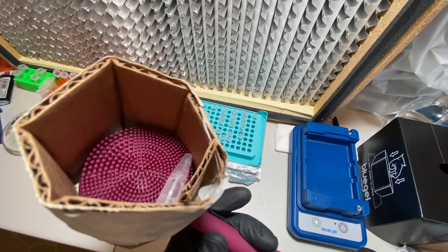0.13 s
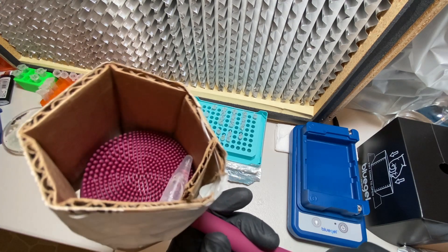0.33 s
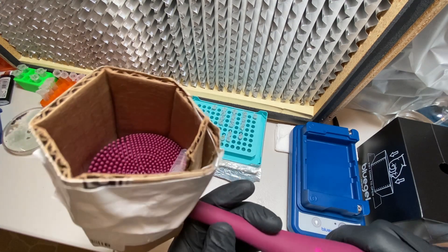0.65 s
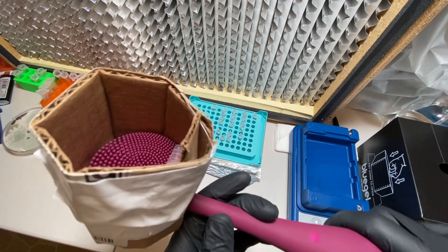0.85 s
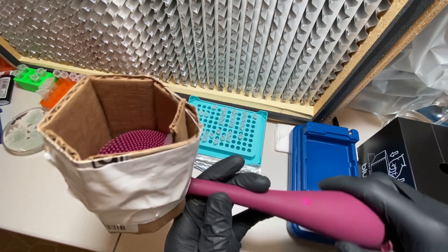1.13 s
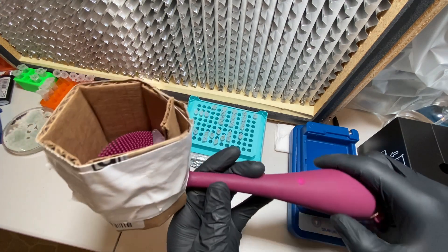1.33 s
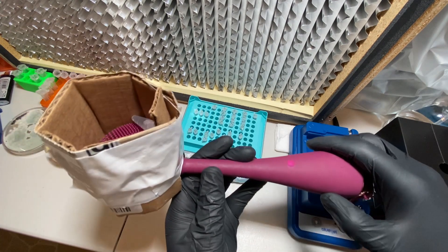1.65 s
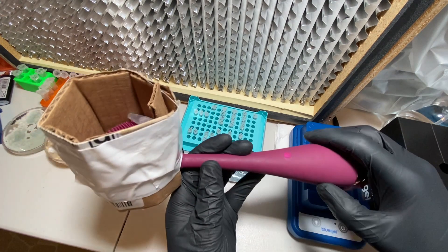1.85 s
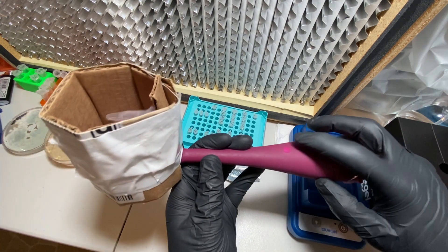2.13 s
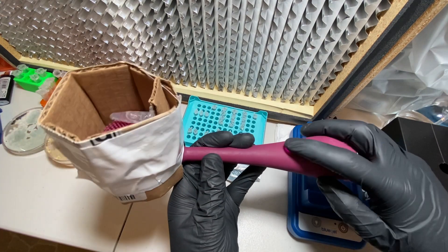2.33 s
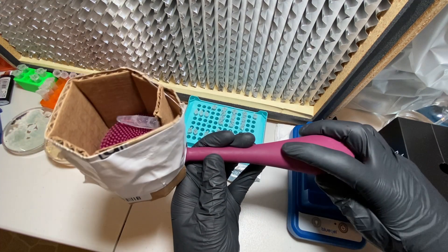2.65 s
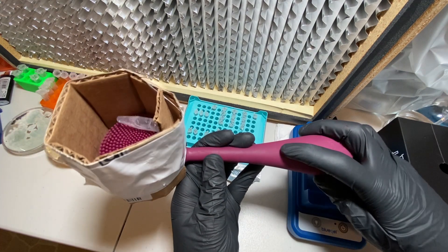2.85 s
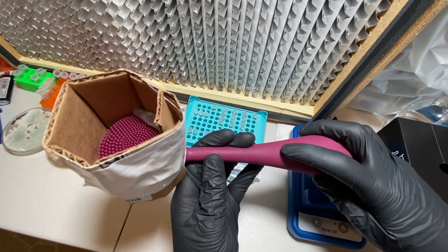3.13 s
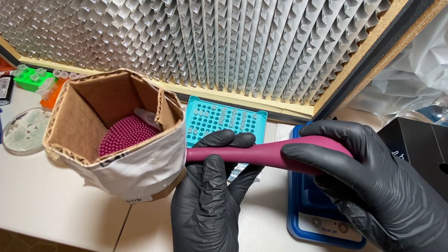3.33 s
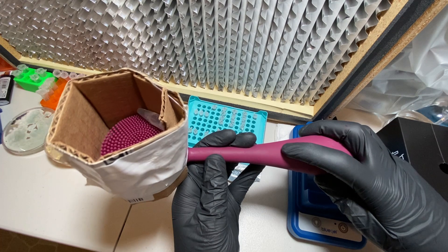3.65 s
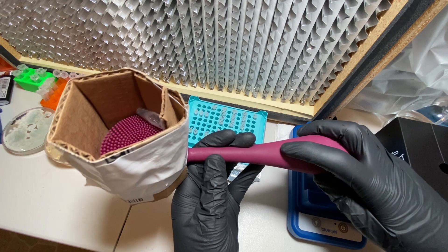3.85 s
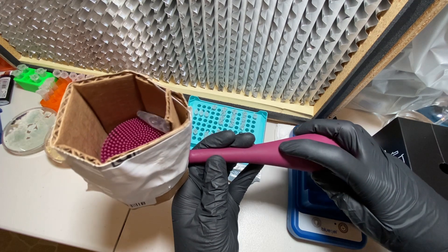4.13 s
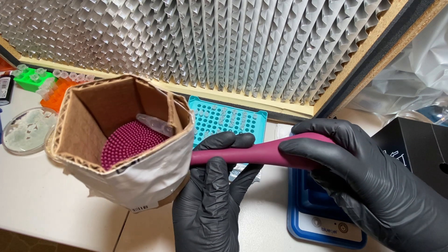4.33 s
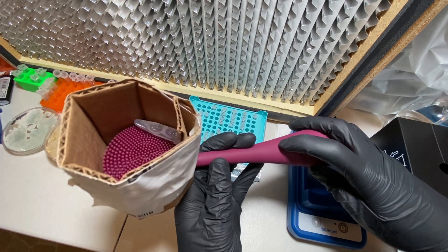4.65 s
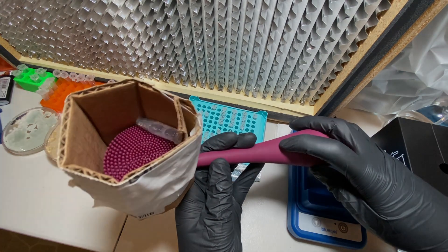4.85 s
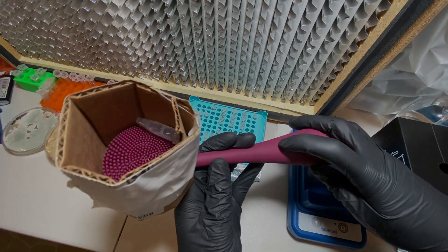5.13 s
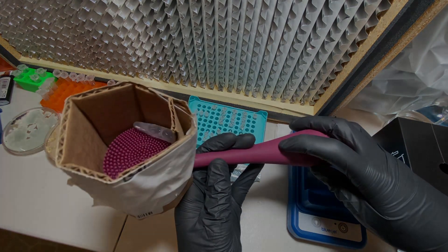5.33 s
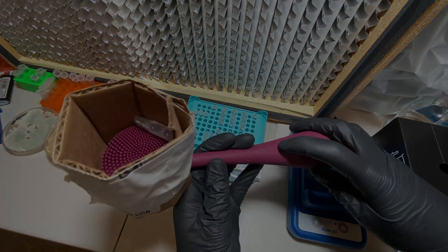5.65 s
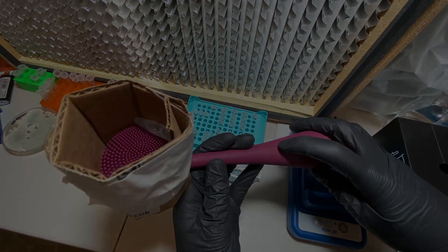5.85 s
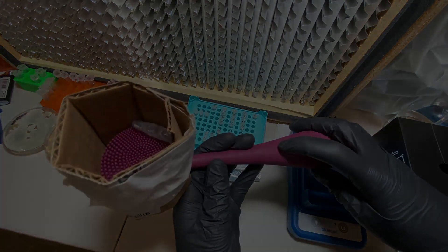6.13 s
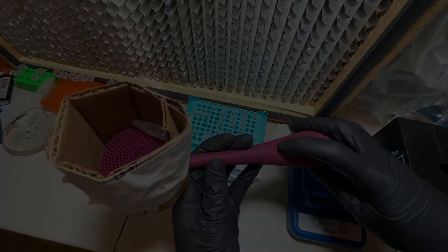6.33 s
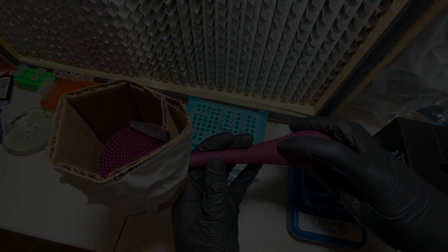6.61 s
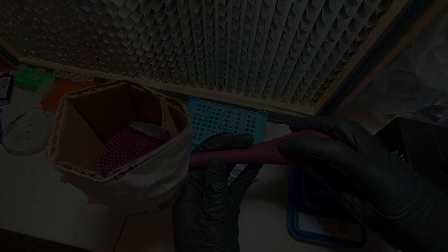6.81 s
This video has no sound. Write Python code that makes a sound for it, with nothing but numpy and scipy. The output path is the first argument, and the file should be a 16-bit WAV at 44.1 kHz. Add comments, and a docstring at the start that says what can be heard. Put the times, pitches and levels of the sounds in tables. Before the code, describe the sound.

Close hollow cardboard knocks and chatter over a deep steady vibrating hum; late button clicks raise the motor's pitch before it slows, over soft ventilation.

```python
"""A small lab, close on the bench: a vibrating massager hums in a cardboard cup and a plastic tube hops on its pad.
From the start knocks ring the cup's modes over a near-sine hum; the mouth tips away until 3.2 s. Chatter, timed by
the motor's turns, thins at 1.1 s; at 1.75 s the tube slides in a run of tiny slips. Far off, noise in low room modes
swells at 3.3 s. Button clicks ring the handle from 5.4 s; near 5.6 s the motor steps up, from 6.6 s it winds down.
Behind it all, ventilation: shaped noise and faint fan tones, fading from 5.2 s."""
import sys
import numpy as np
from scipy import signal
from scipy.io import wavfile
from scipy.ndimage import map_coordinates

SR = 44100
rng = np.random.default_rng(int(sys.argv[2]) if len(sys.argv) > 2 else 0)


def wav_out(sig):
    """Save sig, one row per channel (or a flat mono array), as 16-bit PCM at SR to the path in sys.argv[1]."""
    wavfile.write(sys.argv[1], SR, np.round(np.clip(np.atleast_2d(sig).T, -1, 1) * 32767).astype(np.int16))


N = 307818

# speed of the motor: t/s, turn rate/Hz
MOTOR_SPEED = [(0, 70.3), (5.57, 68.6), (5.66, 80.5), (5.74, 84), (6.56, 84), (6.76, 78), (6.98, 50)]


def motor_turns():
    """Turns completed by the motor at every sample: its speed summed over time."""
    return np.cumsum(in_time(MOTOR_SPEED)) / SR


# shaking of the cup: t/s, relative level/dB
HUM_LEVEL = [(0, -30), (.85, -31.5), (1.1, -33.5), (1.9, -36), (4.3, -35.5), (5.58, -38.5), (5.69, -35.5),
             (5.85, -36.5), (6.3, -39), (6.76, -40), (6.86, -48), (6.98, -62)]
# how far the cup's mouth is tipped away: t/s, share 0-1
MOUTH_TIPPED = [(0, 0.16), (.9, 0.37), (1.4, 0.6), (2.2, 0.73), (3.2, 0.84)]


def motor(turns, wobble_db, second_db):
    """The off-centre weight shakes the cup in a nearly pure sine; the hopping load makes it waver."""
    tipped = in_time(MOUTH_TIPPED)
    sides = np.array([[1], [-1]])
    lag = 1.2 - .6 * tipped  # radians between the sides
    left_db = 5.2 - 1.6 * tipped
    angle = 2 * np.pi * turns + .06 * drift(8) + sides * lag / 2
    wave = np.sin(angle) + from_db(second_db) * np.sin(2 * angle)
    level_db = in_time(HUM_LEVEL) + 1.83 + wobble_db * drift(6.7)
    return np.sqrt(2) * wave * from_db(level_db + sides * left_db / 2)


# knocks of the tube on cup and pad: t/s, relative level of hollow ring/dB, relative level of sharp edge/dB
TUBE_KNOCKS = [(0.005, -26, -37.5), (0.064, -26.5, -39.5), (0.106, -28, -42), (0.166, -29.5, -46.0),
               (0.261, -27.0, -41.5), (0.307, -24.0, -37.5), (0.351, -25.5, -36), (0.392, -30.5, -39.0),
               (0.477, -26, -41.5), (0.511, -28.5, -42), (0.555, -28.5, -44), (0.569, -30, -39.5),
               (0.611, -27.0, -40), (0.666, -32.5, -45.5), (0.725, -27.0, -39), (0.772, -27.5, -40.5),
               (0.813, -27, -43.5), (0.86, -26.5, -40.5), (0.915, -25.5, -37.5), (0.989, -26.0, -37.5),
               (1.031, -29.5, -40.5), (1.088, -28, -39.5), (1.156, -33.5, -40.5), (1.206, -31.5, -44.5),
               (1.247, -27.5, -48), (1.318, -34.5, -43), (1.377, -31.0, -45.0), (1.419, -25.5, -37.5),
               (1.509, -26.5, -42.5), (1.547, -30, -38.5), (1.637, -32, -43), (1.668, -25, -41.5),
               (1.702, -28.5, -50.5), (1.761, -30.5, -63), (1.78, -25, -44), (1.822, -30.0, -43.5),
               (1.893, -27, -45), (1.937, -35, -49.0), (2.056, -26, -38), (2.098, -22, -43),
               (2.136, -32.0, -49.0), (2.166, -34, -47.5), (2.197, -31.5, -48), (2.229, -22.5, -40.5),
               (2.238, -28.5, -38), (2.312, -28, -42), (2.326, -25, -36.5), (2.385, -28.5, -43),
               (2.414, -34.5, -46), (2.476, -25, -40), (2.492, -35, -34), (2.517, -18.0, -38.5),
               (2.599, -24, -52), (2.66, -21.5, -35), (2.824, -27.5, -51), (2.835, -28, -41),
               (2.876, -21, -35), (3.179, -25, -37), (3.236, -34.5, -44), (3.438, -28, -39.5),
               (3.54, -31, -44), (3.684, -27.5, -44), (3.728, -30.5, -40.5), (3.799, -30.5, -41.5),
               (3.83, -36, -51), (3.913, -30, -40.5), (3.942, -32, -44), (4.087, -30, -41.5),
               (4.143, -28.5, -39.5), (4.233, -36, -45), (4.275, -28, -37.0), (4.362, -33.5, -43.5),
               (4.433, -32, -40.5), (4.506, -30, -43.5), (4.562, -34.5, -51), (4.637, -37.5, -41),
               (4.649, -26.5, -36.5), (4.793, -30, -37.5), (4.882, -35.5, -47), (4.913, -37, -45.5),
               (4.937, -30, -37.5), (5.08, -26, -30.5), (5.257, -37, -44), (5.284, -32.5, -49),
               (5.368, -31, -39.5), (5.498, -30, -38.5), (5.574, -32.5, -41), (5.711, -32.5, -43),
               (5.85, -28.5, -39.0), (5.956, -33, -44.5), (6.001, -34.5, -46.0), (6.119, -33.5, -42),
               (6.273, -32.5, -41), (6.393, -35, -45), (6.467, -37, -48), (6.511, -38, -49.0),
               (6.62, -43, -51.0), (6.668, -37, -44.5), (6.857, -41.5, -54)]
# dull landings that flex the wall: t/s, level/dB
WALL_THUDS = [(2.239, -40), (2.329, -31.5)]


def knocks(ring_db, edge_db):
    """The tube lands after each hop; now and then the whole wall gives a dull thud."""
    times, hollow, edge = np.transpose(TUBE_KNOCKS)
    thuds = ring(clicks(*np.transpose(WALL_THUDS)), hz=366, t60=0.069, lag=0.77)
    return contacts(times, hollow + ring_db, edge + edge_db, top_hz=2970, bite_db=5.0) + thuds


# soft, distinct touches in the tipped cup, often one turn before a knock: t/s, relative level/dB
SOFT_GRAZES = [(3.422, -32.5), (3.522, -33), (3.654, -34.0), (3.67, -33), (3.886, -31.5), (4.071, -29.5),
               (4.186, -39), (4.26, -32), (4.322, -30), (4.42, -29.5), (4.706, -29.5), (4.82, -30.0),
               (4.994, -32), (5.196, -31), (5.311, -35), (5.441, -31.5), (5.56, -35), (5.599, -37),
               (5.789, -33.5), (5.814, -35), (5.942, -32.5), (6.096, -32), (6.57, -41), (6.913, -37)]
# light contacts between knocks: t/s, relative level/dB
CHATTER_LEVEL = [(0, -30.5), (1.15, -45.5), (1.68, -45), (1.95, -31), (2.15, -38), (2.9, -45), (3.12, -52),
                 (3.25, -35.5), (6.7, -38), (6.98, -40.5)]
MISSED_SHARE = .28  # share of turns in which the tube touches nothing


def chatter(turns, ring_db, edge_db, uneven_db, jitter_s):
    """Between knocks the tube grazes the wall softly, once a turn or not at all, and damps the ring."""
    at = turn_starts(turns)
    when, force = rng.standard_normal((len(at), 2)).T
    times = at / SR + jitter_s * when
    bout_db, free = rocking(times)
    free = free & (rng.random(len(at)) > MISSED_SHARE)
    db = in_time(CHATTER_LEVEL)[at] + uneven_db * np.minimum(force, 1) + bout_db
    times, db = np.r_[np.c_[times, db][free], SOFT_GRAZES].T
    edge = db + edge_db + 3 * rng.standard_normal(len(db))
    return contacts(times, db + ring_db, edge, top_hz=1600, bite_db=-4.0, soft_db=4.0, ring_share=.55)


def turn_starts(turns):
    """Samples at which the motor begins a new turn."""
    return np.flatnonzero(np.diff(np.floor(turns)))


# in the tipped cup touches build up before each knock and die away after it
BOUT_RISE_S, BOUT_FALL_S, BOUT_DB = 0.025, 0.022, 8.0


def rocking(times):
    """Extra dB of a touch within a bout, and whether the tube is free to touch at that moment at all."""
    wait = np.array(TUBE_KNOCKS)[:, 0] - times[:, None]
    width_s = np.where(wait > 0, BOUT_RISE_S, BOUT_FALL_S)
    nearness = np.exp(-(wait / width_s) ** 2).max(axis=1)
    # right at a knock or graze the tube touches nothing else
    wait = np.c_[wait, np.array(SOFT_GRAZES)[:, 0] - times[:, None]]
    free = np.abs(wait).min(axis=1) > .008
    tipped = np.interp(times, *np.transpose(MOUTH_TIPPED))
    return BOUT_DB * tipped * (nearness - 2 / 3), free


# the tube slides down the wall as the cup tips: start t/s, end t/s, relative level of each tiny slip/dB
WALL_SLIDE = (1.745, 1.955, -37)
SLIPS_PER_S = 280


def slide(edge_db, uneven_db):
    """Sliding, the tube buzzes on the wall several times a turn in a rough run of small contacts."""
    start, end, db = WALL_SLIDE
    times = np.arange(start, end, 1 / SLIPS_PER_S)
    when, force = rng.uniform(-0.98, 1, (len(times), 2)).T
    times = times + when / SLIPS_PER_S / 2
    levels = db + uneven_db * force
    return contacts(times, levels, levels + edge_db, top_hz=2370, bite_db=5.5, soft_db=2.0, ring_share=0.96)


# stiff cardboard under a hard hit: f/Hz, t60/s, relative level/dB, lag of the right side/rad
CARDBOARD_CRACK = [(3310, 0.0019, 9.5, 5.2), (3280, 0.0011, 14, 7.08), (4470, 0.00064, 18, 2.02)]
# the tube's own plastic: f/Hz, t60/s, relative level/dB, lag of the right side/rad
TUBE_PLASTIC = [(10670, 0.0039, 0.5, 2.5), (11800, 0.0014, 6.5, -1.81), (14500, 0.006, -5.5, 1.5)]
RIM_SHADE_DB = 8.0  # loss of the ticks behind the rim of a fully tipped cup


def contacts(times, ring_db, edge_db, top_hz, bite_db, soft_db=0, ring_share=1, tick_db=4.5, bounce_s=0.00189):
    """The tube ticks, the wall cracks, and the cup rings; the tipped rim shades the ticks."""
    tipped = np.clip(np.interp(times, *np.transpose(MOUTH_TIPPED)), 0, 1)
    # each touch is followed, within bounce_s, by a weak bounce
    touches = np.r_[times, times + bounce_s * rng.random(len(times))]
    levels = np.r_[ring_db, ring_db - 12]
    hollow = cup(touches, levels, np.r_[tipped, tipped], bite_db, soft_db, ring_share)
    crack = scuff(times, edge_db - 5 * (1 - tipped), CARDBOARD_CRACK, clean=.5) * pan(4.0)
    tick = scuff(times, edge_db + tick_db - RIM_SHADE_DB * tipped, TUBE_PLASTIC, clean=0.35)
    return band(hollow, 300, top_hz) + band(crack, 1500, 11000) + band(tick, 7000, 18000)


# air trapped in the cup rings on: f/Hz, t60/s, relative level/dB, lag of the right side/rad
CUP_CAVITY = [(1120, 0.12, -29, 2.72), (1232, 0.16, -24, 3.5), (1304, .14, -30, 3.0)]
# air and walls of the cup: mean f/Hz, full t60/s, relative level/dB facing, the same tipped away,
# lag of the right side/rad
CUP_MODES = [(382.5, 0.059, -37, -23, 0.039), (542.2, 0.011, -10.5, -13.5, 4.06),
             (915, 0.057, -19.5, -10.5, 2.78), (1129.4, 0.05, -16.5, 0, 2.545),
             (1219, 0.017, 5.5, -13.5, 2.25), (1602, 0.018, -16.5, -16, 1.66),
             (1754, 0.032, -24.5, -10.5, 2.963), (2062, 0.011, -9, -24.5, 5.52)]
PANEL_SPREAD = 0.04  # panels differ in stiffness: largest share of pitch below and above the mean


def cup(times, db, tipped, upper_db, soft_db, ring_share):
    """Hollow ring of the cup; its colour shifts as the mouth tips, and a little with the panel that is hit."""
    out = strike(times, db, CUP_CAVITY)
    for hz, t60, facing_db, away_db, lag in CUP_MODES:
        panel = rng.integers(-2, 3, len(times))
        mouth_db = facing_db + tipped * (away_db - facing_db)
        colour_db = upper_db * (hz > 1400) + soft_db * (hz < 700)
        level = db + mouth_db + rng.standard_normal(len(times)) + colour_db
        for k in np.unique(panel):
            drive = clicks(times[panel == k], level[panel == k])
            # the upper modes radiate almost no bass
            if hz > 1400:
                drive = np.diff(drive, prepend=0) * SR / (2 * np.pi * hz)
            out = out + ring(drive, hz * (1 + k / 2 * PANEL_SPREAD), t60 * ring_share, lag)
    return out * pan(5.5)


# button on the handle: t/s, relative level/dB
BUTTON_CLICKS = [(5.403, -23.5), (5.582, -37), (6.3401, -26.5), (6.4873, -38.5), (6.9735, -29.5)]
# shell of the handle: f/Hz, t60/s, relative level/dB, lag of the right side/rad
HANDLE_SHELL = [(3770, 0.0021, 6.5, 0.68), (5100, 0.0027, 6, 0.99), (6730, 0.00073, 6, 0.94),
                (11200, 0.0011, 3.5, 1.0)]


def button():
    """Each click of the button is a mostly clean snap that rings the stiff shell of the handle."""
    times, db = np.transpose(BUTTON_CLICKS)
    return band(scuff(times, db, HANDLE_SHELL, clean=.9), 3000, 14000)


def echoes(rattle):
    """Bench and hood close by return the rattle and, brighter, bare impulses at the button's clicks."""
    from_rattle = room(rattle, t60=0.1503, low_hz=320, high_hz=8200, gap_s=0.0052)
    impulses = clicks(*np.transpose(BUTTON_CLICKS))[None]
    from_button = room(impulses, t60=0.22, low_hz=3620, high_hz=7560, gap_s=0.0021)
    return from_db(-14.5) * from_rattle + from_db(6.5) * from_button


# whine of the rotor: multiples of its speed
ROTOR_ORDERS = (11, 13, 16, 21)
# one for each multiple: relative level/dB
ROTOR_LEVELS = (-64, -60.5, -65.5, -75)
# overall fade of whine and ventilation: t/s, gain/dB
BACKGROUND_FADE = [(5.2, 1), (6.98, -7)]


def whine(turns, wobble_db):
    """The rotor sings faintly on a few multiples of its speed."""
    lines = 0
    for order, db in zip(ROTOR_ORDERS, ROTOR_LEVELS):
        gain = from_db(db + wobble_db * drift(1))
        angle = 2 * np.pi * order * turns + order * 0.032 * drift(3.7)
        lines = lines + gain * np.sin(angle - np.array([[0], [2.4]]))
    return np.sqrt(2) * lines * from_db(in_time(BACKGROUND_FADE)) * pan(6.5)


# distant rumble: t/s, relative level/dB
RUMBLE_LEVEL = [(0, -52.5), (1.5, -55.5), (2.8, -50.5), (3.3, -47), (3.8, -50), (4.3, -55.5), (6.98, -58.5)]
# low room resonances that carry it: f/Hz, width/Hz, relative level/dB
LOW_ROOM_MODES = [(110, 54, -5), (139.8, 7.5, -5.5), (195.7, 25.7, -3), (279.8, 29, -8), (319, 89, -8.5)]
# pitch of the drone in the rumble: t/s, f/Hz
DRONE_PITCH = [(2.85, 285), (2.95, 247.6), (3.2, 250), (3.43, 346.3), (3.52, 278), (3.65, 241.4)]


def rumble(drone_db):
    """Far noise swells in the low resonances of the room; a narrow drone wanders in pitch inside it."""
    out = 0
    for hz, width_hz, db in LOW_ROOM_MODES:
        t60 = np.log(1000) / np.pi / width_hz
        out = out + from_db(db) * rms_one(ring(rng.standard_normal(N), hz, t60, 0.66))
    angle = 2 * np.pi * np.cumsum(in_time(DRONE_PITCH)) / SR + .6 * drift(10)
    drone = np.sin(angle - np.array([[0], [.8]])) * from_db(drone_db + 3 * drift(5))
    return (rms_one(out) + drone) * from_db(in_time(RUMBLE_LEVEL))


# ventilation spectrum: f/Hz, relative density level/dB
AIR_SPECTRUM = [(120, -12), (240, -12), (360, 3), (600, -3), (850, -7), (1200, 4.5), (1700, -11.5),
                (2400, -9), (4800, -15), (9000, -23), (16000, -28.5)]
# likeness of left and right microphone in the air noise: f/Hz, correlation
SIDE_LIKENESS = [(100, 0.61), (400, 0.029), (1000, 0.017)]
# fan tones: f/Hz, level before the fade/dB
FAN_TONES = [(147, -71), (1954, -68), (2094, -72.5)]


def ventilation(air_db, duct_db):
    """Smooth air noise, a low duct rumble and faint wavering fan tones."""
    out, edges = 0, 100 * 2 ** (np.arange(16) / 2)  # half octaves from 100 Hz
    white = rng.standard_normal((2, 2, N))
    for k, (low, high) in enumerate(zip(edges, edges[1:])):
        # neighbouring bands use separate noise
        mid, side = band(white[k % 2], low, high)
        hz = np.sqrt(low * high)
        alike = np.clip(at_hz(SIDE_LIKENESS, hz), -1, 1)
        pair = np.sqrt(1 + alike) * mid + np.sqrt(1 - alike) * side * [[1], [-1]]
        out = out + from_db(at_hz(AIR_SPECTRUM, hz)) * pair
    duct = rms_one(band(rng.standard_normal(N), 28, 100)) * pan(4.0)
    # sharply resonant noise wavers like a tone
    fan = sum(from_db(db) * rms_one(ring(rng.standard_normal(N), hz, .5, 1.5)) for hz, db in FAN_TONES)
    noise = from_db(air_db) * rms_one(out) + from_db(duct_db) * duct
    return (noise + fan) * from_db(in_time(BACKGROUND_FADE))


def scuff(times, db, modes, clean, length_s=0.0011):
    """A clean snap, then a short burst of tiny impacts between rough surfaces, drive the modes."""
    decay = np.exp(-1 / (length_s * SR))
    snap, clean = clicks(times, db), np.clip(clean, 0, 1)
    energy = signal.lfilter([1 - decay], [1, -decay], snap ** 2 + 1e-18)
    drive = np.sqrt(clean) * snap + np.sqrt((1 - clean) * energy) * rng.standard_normal(N)
    out = 0
    for k, (hz, t60, level, lag) in enumerate(modes):
        # the modes alternate in sign
        out = out + (-1) ** k * from_db(level) * ring(drive, hz, t60, lag)
    return out


def strike(times, db, modes):
    """Clean blows set the modes ringing."""
    return sum(ring(clicks(times, db + level), hz, t60, lag) for hz, t60, level, lag in modes)


def ring(drive, hz, t60, lag):
    """A decaying mode, reaching the right side with a phase lag."""
    pole = from_db(-60 / (t60 * SR)) * np.exp(2j * np.pi * hz / SR)
    z = signal.lfilter([1], [1, -pole], drive + 1e-18)
    return np.array([z.imag, (z * np.exp(-1j * lag)).imag])


def clicks(times, db):
    """One impulse for each contact."""
    out = np.zeros(N)
    at = np.clip(np.round(times * SR).astype(int), 0, N - 1)
    np.add.at(out, at, from_db(db))
    return out


def room(x, t60, low_hz, high_hz, gap_s):
    """Dense reflections after a short gap: decaying noise, different on each side."""
    t = np.arange(SR // 2) / SR
    noise = band(rng.standard_normal((2, len(t))), low_hz, high_hz)
    tail = noise * from_db(-60 * t / t60) * (t > gap_s)
    tail /= np.sqrt(np.sum(tail ** 2, axis=1, keepdims=True))
    return signal.fftconvolve(x, tail, axes=1)[:, :N]


def band(x, low_hz, high_hz):
    """Second-order Butterworth band-pass."""
    sos = signal.butter(2, [low_hz, min(high_hz, .45 * SR)], "band", fs=SR, output="sos")
    return signal.sosfilt(sos, x)


def drift(rate):
    """Smooth chance with spread near 1, from 2 * rate random knots a second."""
    knots = rng.standard_normal(4000)
    return map_coordinates(knots, [np.arange(N) / SR * 2 * rate], order=3, mode="wrap")


def pan(left_db):
    """Gains of the two sides, the left louder by left_db."""
    return from_db(np.array([[left_db], [-left_db]]) / 2)


def in_time(rows):
    """A curve at every sample."""
    return np.interp(np.arange(N) / SR, *np.transpose(rows))


def at_hz(points, hz):
    """Read a spectrum on a log-frequency axis."""
    f, value = np.transpose(points)
    return np.interp(np.log(hz), np.log(f), value)


def from_db(db):
    """Decibels to gain."""
    return 10 ** (np.asarray(db) / 20)


def rms_one(x):
    """Scale to unit rms."""
    return x / np.sqrt(np.mean(x ** 2) + 1e-20)


def scene():
    """Motor, rattling tube and button close by on the bench, with the lab behind."""
    turns = motor_turns()
    hum = motor(turns, wobble_db=.5, second_db=-32.5)
    rattle = knocks(ring_db=5.5, edge_db=5.0)
    rattle += chatter(turns, ring_db=5.0, edge_db=-19.0, uneven_db=4.0, jitter_s=.0006)
    rattle += slide(edge_db=-26.0, uneven_db=4.0)
    near = hum + rattle + button() + echoes(rattle) + whine(turns, wobble_db=2.5)
    lab = rumble(drone_db=-7.5) + ventilation(air_db=-55.5, duct_db=-56.5)
    return near + lab


CUTOFF_HZ = 16300


def record(dry):
    """At the microphones the top is cut steeply, by an elliptic low-pass."""
    return signal.sosfilt(signal.ellip(10, .1, 80, CUTOFF_HZ, fs=SR, output="sos"), dry)


dry = scene()
out = record(dry)
wav_out(out)
```